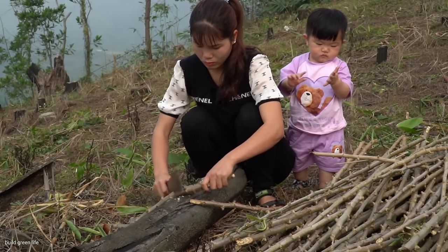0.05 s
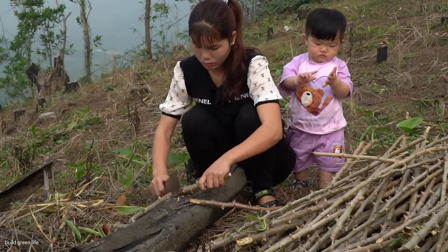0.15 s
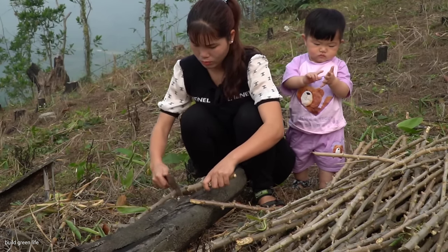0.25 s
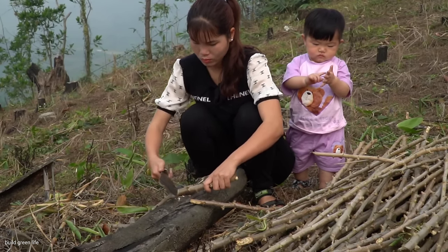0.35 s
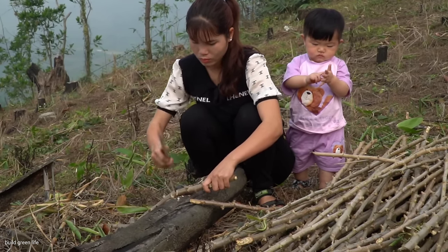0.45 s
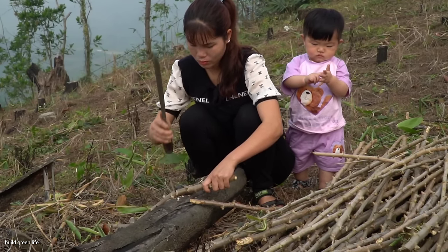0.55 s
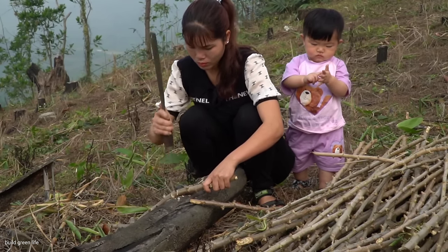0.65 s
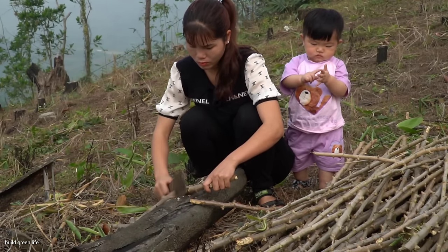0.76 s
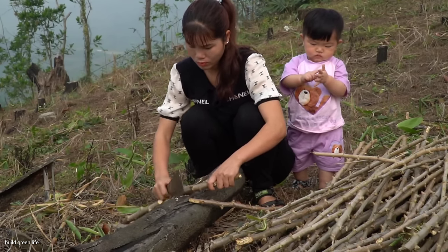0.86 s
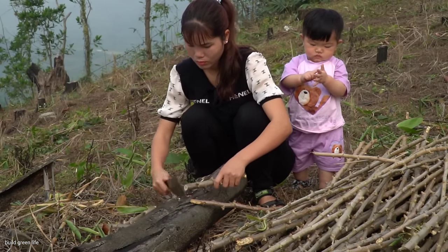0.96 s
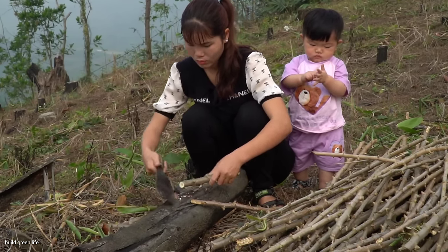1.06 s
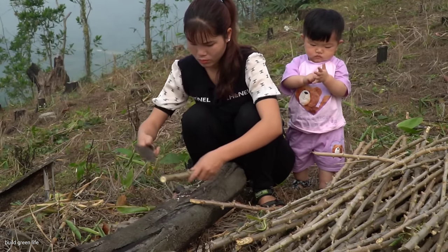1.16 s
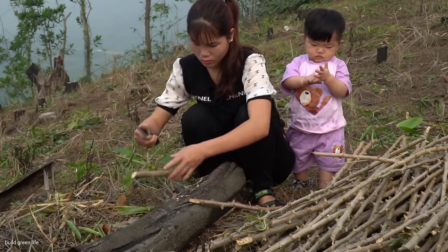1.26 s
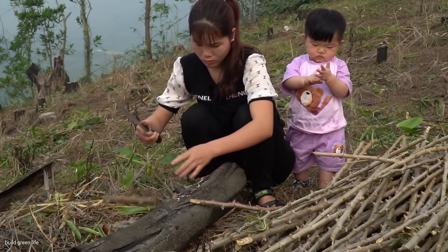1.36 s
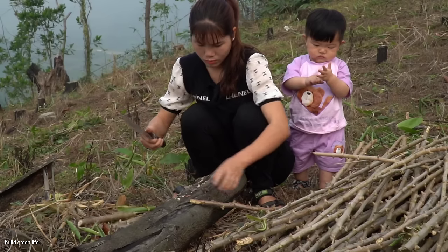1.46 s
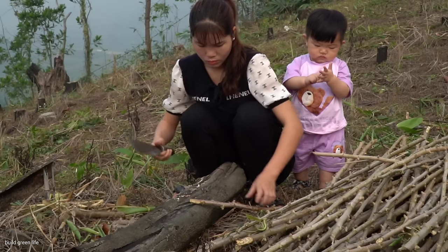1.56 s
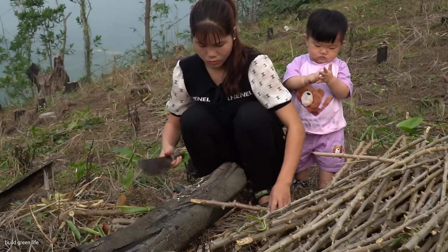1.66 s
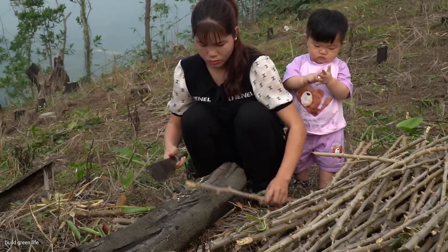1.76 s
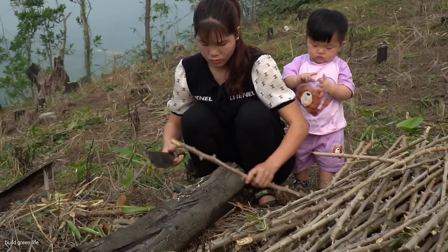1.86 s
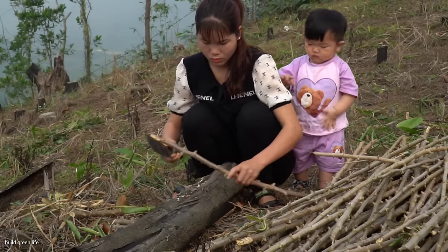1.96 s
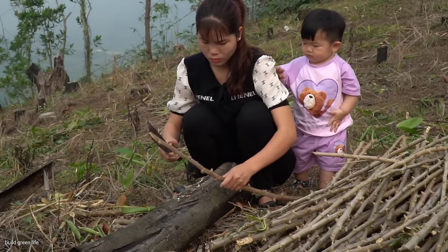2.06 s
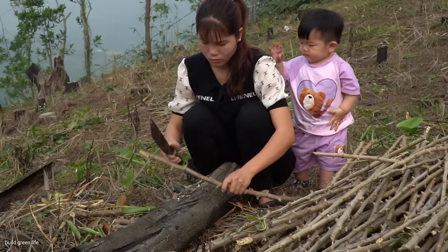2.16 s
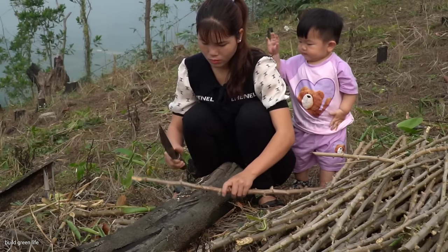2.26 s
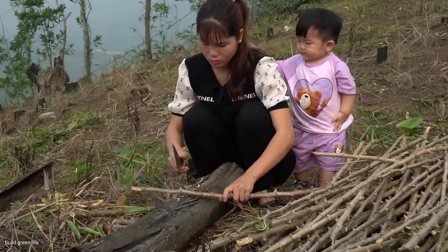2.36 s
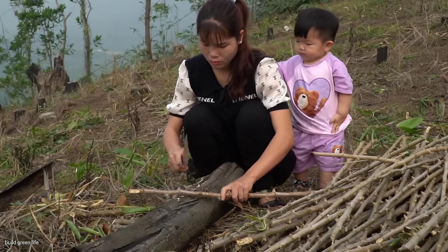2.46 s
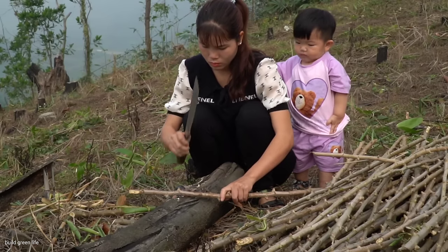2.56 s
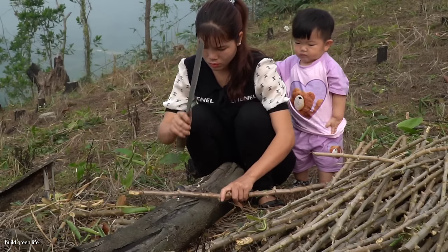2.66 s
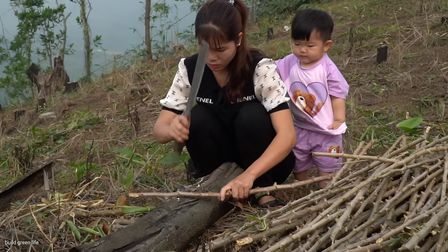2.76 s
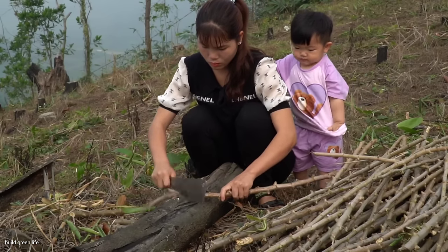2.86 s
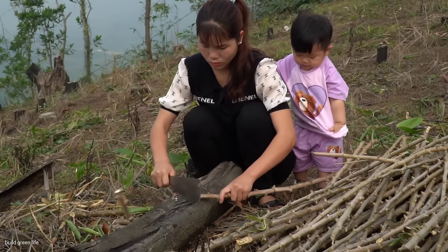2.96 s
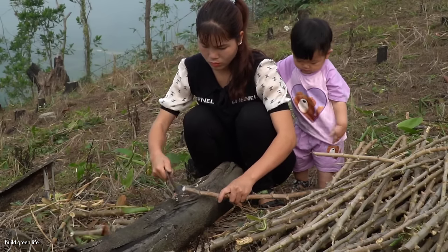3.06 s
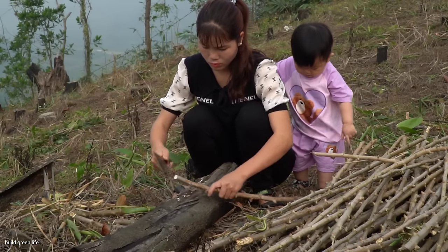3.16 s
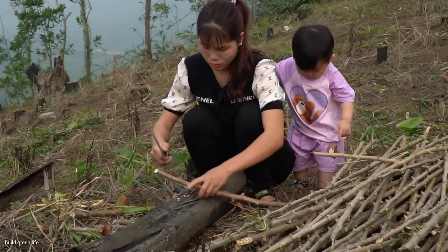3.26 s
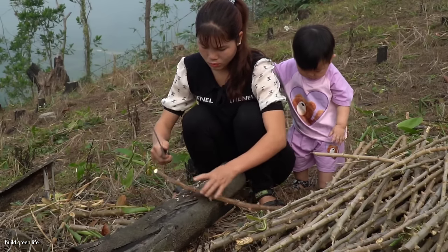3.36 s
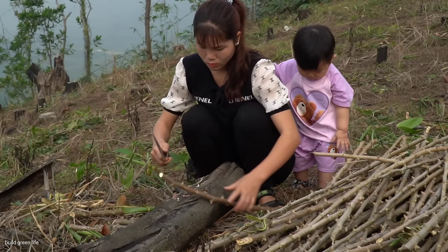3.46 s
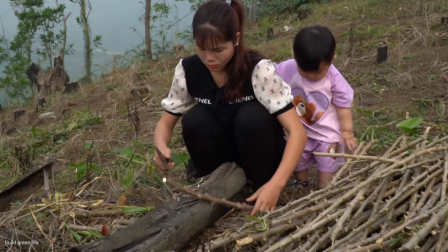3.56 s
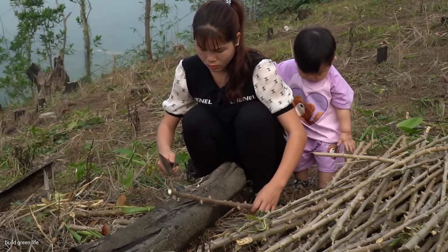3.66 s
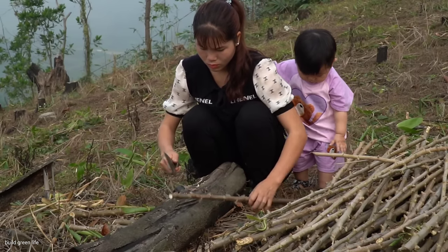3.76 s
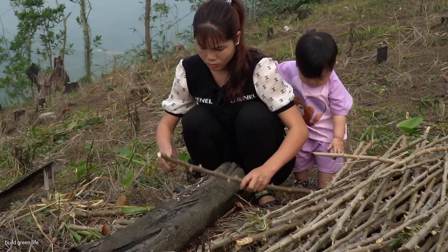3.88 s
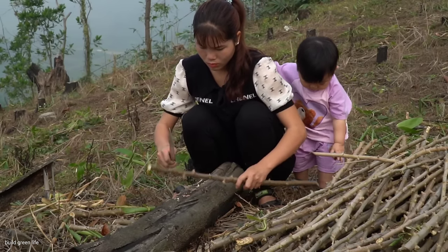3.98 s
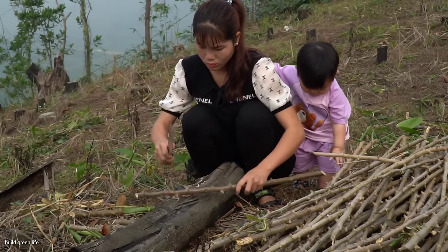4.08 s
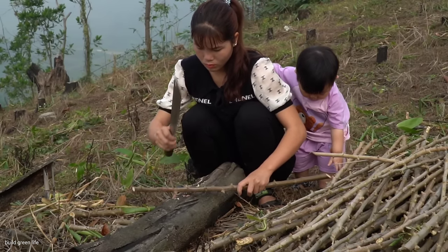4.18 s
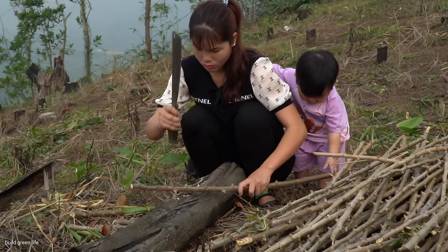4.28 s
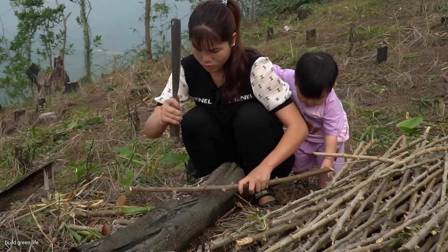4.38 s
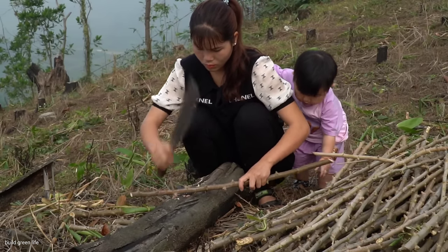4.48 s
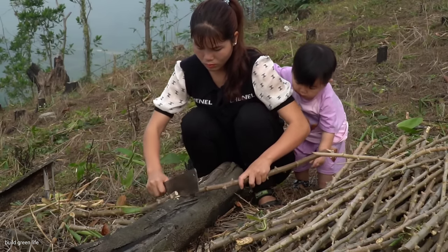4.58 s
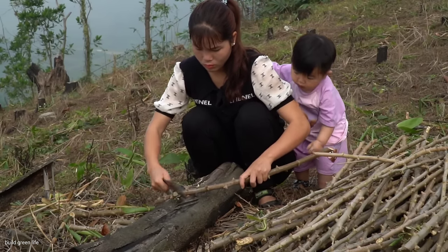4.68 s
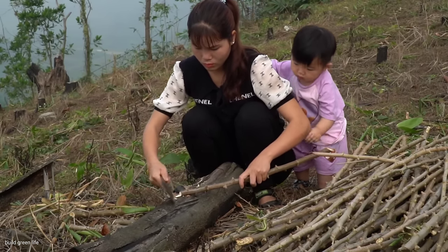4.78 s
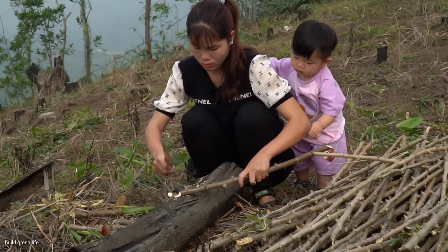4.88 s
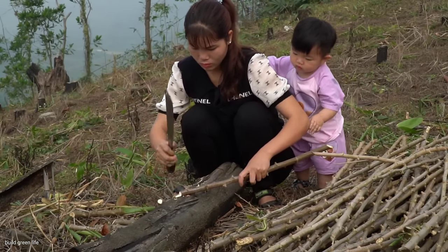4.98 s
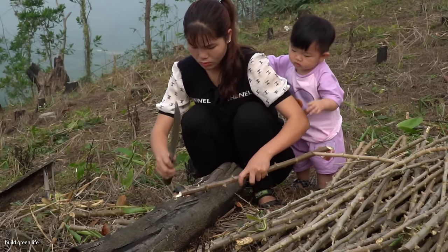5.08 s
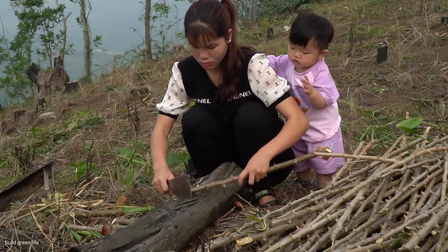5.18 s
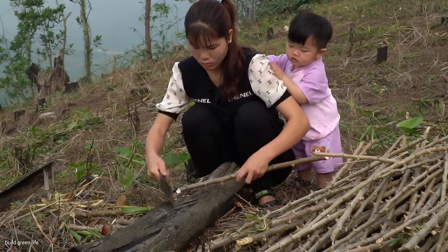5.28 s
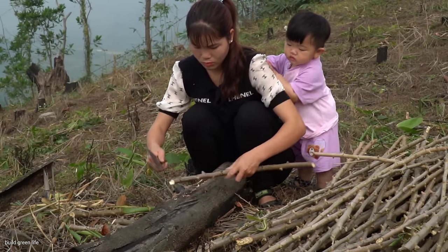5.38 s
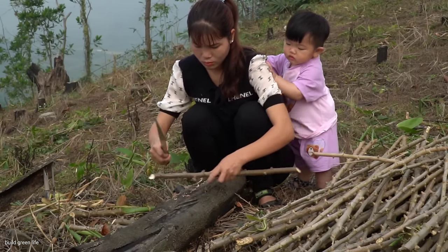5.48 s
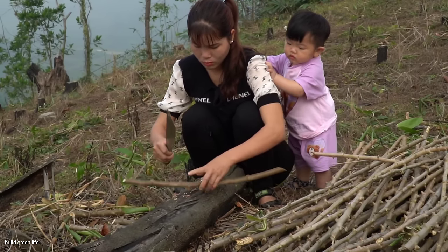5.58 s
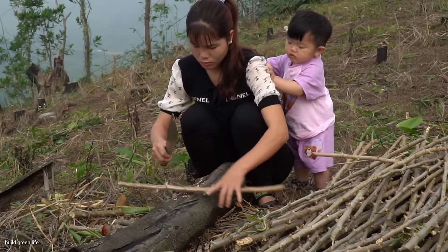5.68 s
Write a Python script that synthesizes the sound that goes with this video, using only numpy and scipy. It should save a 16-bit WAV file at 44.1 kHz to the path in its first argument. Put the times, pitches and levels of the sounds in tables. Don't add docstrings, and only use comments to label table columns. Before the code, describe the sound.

Outdoors, sharp uneven blade strokes split stems against a log, dull thuds following, over birdsong, insect shimmer, pump hum and a faraway engine.

```python
import sys
import numpy as np
from scipy import signal
from scipy.fft import rfft, irfft
from scipy.io import wavfile
from scipy.ndimage import uniform_filter1d

SR = 44100
rng = np.random.default_rng(int(sys.argv[2]) if len(sys.argv) > 2 else 0)


def gain_from_db(level_db):
    decades = np.asarray(level_db, float) / 20
    return 10 ** decades


def wav_record(signal):
    frames = np.transpose(np.atleast_2d(signal))
    bounded = np.clip(frames, -1, 1)
    quanta = np.round(bounded * 32767).astype(np.int16)
    wavfile.write(sys.argv[1], SR, quanta)


N = 252680
T = np.arange(N) / SR
MONO_DB = 2.5


def unit(x):
    return x / np.sqrt(np.mean(x ** 2))


def colour(shape):
    hz, db = np.transpose(shape)
    freq_hz = np.maximum(np.arange(N // 2 + 1) * SR / N, 1)
    gain = gain_from_db(np.interp(np.log(freq_hz), np.log(hz), db))
    return unit(irfft(rfft(rng.standard_normal(N)) * gain, N))


def noise_band(lo_hz, hi_hz):
    sos = signal.butter(2, [lo_hz, hi_hz], "band", fs=SR, output="sos")
    return unit(signal.sosfilt(sos, rng.standard_normal(N)))


def walk(rate_hz):
    hold = int(SR / rate_hz)
    steps = np.repeat(rng.standard_normal(N // hold + 1), hold)
    return unit(uniform_filter1d(uniform_filter1d(steps, hold), hold)[:N])


def curve(rows, column=1, outside=-120):
    rows = np.array(rows)
    return np.interp(T, rows[:, 0], rows[:, column], outside, outside)


def add(out, start_s, x):
    i = max(int(start_s * SR), 0)
    out[i:i + len(x)] += x[:N - i]


def fade(db, t60_s, rise_s=0.0012):
    t = T[:int(SR * min(t60_s, 1))]
    return gain_from_db(db - 60 * t / t60_s) * (1 - np.exp(-t / rise_s))


def ring(hz, db, t60_s, rise_s=0.001, pinch=0):
    pinch_s = 0.0038
    shape = fade(db, t60_s, rise_s)
    t = T[:len(shape)]
    return shape * np.sin(2 * np.pi * hz * (t - pinch * pinch_s * (1 - np.exp(-t / pinch_s))))


# freq_hz, level_db
HISS = [(10, 26), (25, 10), (100, 9), (400, 3), (3200, -1.5), (15300, 0.5), (15800, -40)]


def input_hiss():
    return colour(HISS) * gain_from_db(-57.5)


# freq_hz, level_db
AIR = [(15, -76), (25, 1.5), (59, -14), (223, -18), (476, -25.5), (624, -22), (734, -23), (1130, -28),
       (3720, -33.5), (4610, -39), (5730, -38.5), (14800, -47), (16000, -71)]
# time_s, level_db
GUST = [(0.0, -19.5), (0.45, -32.5), (0.65, -24), (1.05, -35), (1.72, -24.5), (2.28, -19.5), (2.46, -33),
        (2.71, -20.5), (2.97, -25), (3.3, -19), (3.6, -28), (3.88, -23), (4.0, -37), (4.62, -31.5),
        (5.09, -20), (5.37, -23), (5.5, -14), (5.73, -37)]


def hillside():
    gust_db = curve(GUST)
    breeze_db = uniform_filter1d(gust_db, size=SR // 2)
    breeze_db = breeze_db - breeze_db.mean()
    hush_db = -39 + MONO_DB - 1.5 + 0.096 * breeze_db + 0.14 * walk(4.87)
    hush = colour(AIR) * gain_from_db(hush_db)
    return hush + noise_band(3.9, 10.0) * gain_from_db(gust_db + MONO_DB)


# time_s, firing_hz, level_db
ENGINE = [(0.0, 147.7, -41), (0.37, 113, -43), (0.57, 78.5, -45), (0.77, 122.1, -39.5), (1.3, 74, -62),
          (1.52, 105.5, -42.5), (1.75, 106.4, -41), (1.9, 75.55, -46), (2.05, 82.2, -44),
          (2.22, 110.8, -39.5), (2.65, 74.1, -65), (2.97, 112, -39), (3.25, 77.9, -45), (3.5, 79.8, -46),
          (3.72, 113.7, -39.5), (4.2, 72.2, -69), (4.6, 102.7, -46.5), (5.15, 98, -50)]


def engine():
    last_s, last_hz, last_db = ENGINE[-1]
    pull_away_hz_per_s = 75
    end = (T[-1], last_hz + pull_away_hz_per_s * (T[-1] - last_s), last_db + 6.5)
    blips = ENGINE + [end]
    hz = uniform_filter1d(curve(blips, outside=100), size=SR // 20)
    phase = 2 * np.pi * np.cumsum(hz * (1 + 0.016 * walk(21.94))) / SR
    tone = np.sin(phase) + gain_from_db(-13) * np.sin(4 / 3 * phase) + gain_from_db(-15) * np.sin(2 * phase)
    roar = gain_from_db(-18) * noise_band(800, 1100) * (hz / 100) ** 2
    slowing = np.clip(-np.gradient(hz) * SR / 100, 0, 1)
    level_db = curve(blips, column=2) + 7.5 - 6 * slowing + 2 * walk(23.15)
    return (tone + roar) * gain_from_db(level_db)


# pitch_hz, level_db
PUMP = [(53, -41.5), (107, -49.5), (160, -55.5), (212, -51.5), (265, -58)]


def pump():
    hum = np.zeros(N)
    for hz, db in PUMP:
        level = gain_from_db(db + 2.45 * walk(5.4))
        hum += level * np.sin(2 * np.pi * hz * T + walk(3.68))
    return hum


def insects_and_flock():
    flock = noise_band(4000, 5170) * gain_from_db(-57.5 + 1.3 * walk(40))
    insects = noise_band(4296, 4694) * gain_from_db(-50 + 2.4 * walk(120) + 0.63 * walk(15))
    thinning_db = np.interp(T, [3.1, 3.7], [0, -5])
    chorus = noise_band(4800, 6300) * gain_from_db(-61 + thinning_db + 3.1 * walk(25.03))
    return flock + insects + chorus


# delay_s, from_hz, to_hz, length_s, level_db
NOTES = [(-.004, 7100, 4660, 0.026, 0), (0.059, 5300, 3097, 0.027, 3.5)]
# start_s, from_hz, to_hz, length_s, level_db
CHEEPS = [(1.39, 3270, 4630, 0.043, -42), (1.93, 3400, 4350, .025, -43), (2.115, 3337, 4500, 0.023, -42),
          (2.12, 6310, 6000, 0.076, -51), (2.2, 6400, 5860, .06, -54), (.69, 3900, 3000, .025, -47),
          (.9, 4800, 3190, .03, -46), (1.42, 5000, 3310, .03, -52), (1.6, 4800, 3290, 0.033, -43),
          (2.075, 6200, 4720, 0.021, -44), (2.55, 5620, 4160, 0.018, -45), (3.3, 6300, 5290, .05, -48),
          (2.32, 6130, 4610, 0.036, -42.5), (2.37, 6840, 5940, 0.046, -52), (2.62, 6450, 4600, 0.022, -47),
          (2.655, 6040, 4930, 0.032, -45.5), (4.41, 6800, 4740, 0.017, -51),
          (5.365, 6300, 6160, 0.086, -54), (5.5, 5060, 5890, .05, -49), (5.55, 5860, 7170, 0.059, -52),
          (5.6, 7240, 7000, .12, -62)]


def birds():
    calls = list(CHEEPS)
    for i in range(10):
        phrase_s = .502 + i * (.168 + i * .0009)
        for delay_s, from_hz, to_hz, length_s, db in NOTES:
            calls.append((phrase_s + delay_s, from_hz, to_hz, length_s, db - 44.5))
    for a, b, c in rng.random((130, 3)):
        calls.append((2.7 * a, 5200 + 1600 * b, 3600 + 1500 * b, .03, -55 + 4 * c))
    out = np.zeros(N)
    warble = 1.2 * walk(700)
    for start_s, from_hz, to_hz, length_s, db in calls:
        size = int(length_s * SR)
        phase = 2 * np.pi * np.cumsum(np.geomspace(from_hz, to_hz, size)) / SR
        phase = phase + warble[int(start_s * SR):][:size]
        shape = np.hanning(size) ** 0.11 * np.linspace(.55, 1.2, size)
        add(out, start_s, gain_from_db(db) * shape * np.sin(phase))
    trees = fade(-32, 0.25, rise_s=0.0031)
    trees = trees * rng.standard_normal(len(trees))
    return out + signal.fftconvolve(out, trees)[:N]


# start_s, end_s, bright_db, woody_db
RUSTLES = [(0.12, 0.15, -27, -50), (0.153, 0.175, -43, -60), (0.343, 0.361, -44, -64),
           (0.359, 0.414, -53, -44), (0.879, 0.95, -68, -44), (1.081, 1.13, -64, -46),
           (1.5, 1.64, -46, -48), (1.614, 1.71, -52.5, -50), (1.695, 1.803, -49, -41),
           (1.85, 1.955, -55.5, -52), (2.056, 2.087, -64, -47.5), (2.22, 2.27, -68, -47.5),
           (2.947, 3.026, -56, -40), (3.122, 3.188, -42, -52), (3.142, 3.173, -50, -41),
           (3.168, 3.226, -51, -64), (3.31, 3.388, -47, -57), (3.335, 3.376, -70.5, -37.5),
           (3.373, 3.43, -55, -45), (3.588, 3.7, -41.5, -43), (3.725, 3.838, -52, -49.5),
           (3.848, 3.92, -59, -69.5), (4.608, 4.637, -30, -55), (4.637, 4.67, -41, -50),
           (1.46, 1.5, -55, -70), (4.783, 4.844, -49.5, -42.5), (4.927, 4.999, -51, -53),
           (5.147, 5.217, -54.5, -54), (5.24, 5.248, -36, -38), (5.298, 5.33, -60, -55),
           (5.669, 5.716, -56, -49.5)]
# start_s, end_s, bright_db, green_db, woody_db
TEARS = [(0.1227, 0.127, -24, -12, -12), (0.8494, 0.8519, 0, -18, -13), (0.852, 0.855, -28, -34, -20),
         (2.9424, 2.951, -8.5, -13, -20), (4.609, 4.615, -3, -13, -6), (5.24, 5.243, -41, -27, -24),
         (5.242, 5.2447, -28, -19, -22)]
# start_s, bright_db, woody_relative_db, t60_s
BREAK = [(.3308, -30, -14, .012), (.336, -17, -14, .014), (.3378, -20, -16, .022), (.3499, -23, -14, .022),
         (.359, -25, -12, .014), (.3618, -25, -8, .02), (.3655, -29, -8, .03), (.3988, -33, -4, .045)]
# start_s, level_db
SNAPS = [(1.727, -35), (1.747, -36), (1.8774, -59), (2.2934, -41.5), (2.8646, -36.5), (2.9645, -33),
         (3.1245, -35.5), (3.133, -45), (3.3455, -37), (3.5977, -46), (3.6077, -37), (1.5427, -44),
         (1.7123, -48), (3.183, -34), (3.1897, -46), (3.494, -46), (3.59, -34), (3.634, -40), (3.6433, -45),
         (3.688, -36.5), (3.9758, -43), (4.1396, -48), (4.3439, -47), (4.618, -20), (4.638, -25),
         (4.652, -30), (4.664, -35), (4.657, -36), (4.6715, -42), (4.6928, -35.5), (4.732, -36.5),
         (4.779, -41), (4.7875, -37), (4.9441, -49), (5.45, -41)]
# start_s, level_db
TAPS = [(0.1915, -53), (0.8877, -29), (1.1029, -26), (1.491, -29), (1.5023, -22.5), (1.513, -26),
        (1.561, -36), (1.8063, -38), (2.986, -38), (3.347, -37), (3.3871, -24), (3.457, -40),
        (3.4935, -34.5), (3.9756, -39), (4.638, -27), (4.8104, -41), (4.9444, -34.5), (5.0701, -33),
        (5.279, -25), (5.3644, -23), (5.448, -35.5), (5.526, -40)]
# start_s, level_db
GREEN_SNAPS = [(.162, -36), (.8873, -37), (4.6095, -8), (4.612, -14), (4.638, -26), (4.621, -24),
               (2.9435, -12), (5.248, -35), (5.2795, -38), (5.333, -48)]
# freq_hz, level_db
BARK = [(3500, -11), (5200, 4), (6600, -2.5), (9300, 3.5), (11500, -0.5), (15300, -3), (15900, -55)]
# freq_hz, level_db
TWIG = [(200, -6), (420, -2.5), (700, -2), (1250, -4), (1600, -6.5), (2100, -6), (2600, -7.5), (3200, -6),
        (4200, -19.5), (6500, -27.5)]
# freq_hz, level_db
GREEN = [(4000, -9), (6000, -3), (9500, 4), (11000, -12), (15300, -18), (15900, -55)]


def twigs():
    bright, green, woody, rub, drag = np.zeros((5, N))
    clicks = list(BREAK)
    clicks += [(s, db, -14, 0.03) for s, db in SNAPS]
    clicks += [(s, db - 27, 27, 0.021) for s, db in TAPS]
    for s, db, wood_db, t60_s in clicks:
        add(bright, s, fade(db - 2, t60_s, rise_s=.00015))
        add(bright, s, fade(db + 4, .005, rise_s=.0001))
        add(woody, s, fade(db + wood_db + 1, 1.6 * t60_s, rise_s=.0008))
    for s, db in GREEN_SNAPS:
        add(green, s, fade(db + 3, .022, rise_s=.0002))
    rubs = [(start, end, db, -99, wood_db) for start, end, db, wood_db in RUSTLES]
    for start, end, db, green_db, wood_db in rubs + TEARS:
        shape = signal.windows.tukey(int((end - start) * SR), .5)
        add(rub, start, gain_from_db(db) * shape)
        add(green, start, gain_from_db(green_db) * shape)
        add(drag, start, gain_from_db(wood_db) * shape)
    grain = gain_from_db(4.5 * walk(800) + 1.1 * walk(120))
    dry_fibre = (bright + rub * grain) * colour(BARK)
    wood = (woody + drag * grain) * colour(TWIG)
    return gain_from_db(MONO_DB) * (dry_fibre + wood + green * colour(GREEN))


# start_s, crack_db, stem_hz, stem_db, limiter_dive_db
CHOPS = [
    (0.1231, 1.5, 662, 9, 23),
    (0.8491, 0, 633, 15, 23.5),
    (2.9432, 3.5, 668, 17, 22.5),
    (4.6096, -5, 653, 4.5, 17.5),
    (5.241, -9.5, 627.6, 6, 12.5),
]
PINCH = [.02, 0.08, .2, 0.11, 0.041]
# touch_s, how long the edge touches bark before it bites
TOUCH_S = [0.00059, 0.0017, 0.00061, .0008, .001]
STEM_RING = [1, 0.97, .8, 0.94, 0.92]
# pitch_ratio, level_db, t60_s
STEM = [(1.002, 3.5, 0.056), (.93, -26, 0.0058), (1.069, -29, 0.14), (1.588, -7.5, 0.042),
        (2.08, -13, 0.03), (2.6, -18, 0.036), (3.1, -17.5, 0.035)]
# freq_hz, level_db
CRACK = [(250, -49), (500, 0), (800, -8), (1400, -4.5), (2150, -6), (2450, -22), (3200, -24), (4500, -18),
         (9000, -22.5)]
# start_s, pitch_hz, level_db, t60_s
BITES = [(.1232, 662, 7.5, 0.084), (.1233, 985, 19, .02), (.1232, 678, -1, .14), (.132, 1040, -12, .06),
         (.3365, 2000, -14.5, 0.018), (0.31, 2030, -23, 0.011), (.8497, 2070, 10, 0.016),
         (.8497, 1706, 16.5, 0.014), (2.9436, 966, 16.5, 0.021), (.8497, 3300, 2, .014),
         (2.944, 2090, 12, 0.014), (2.947, 6200, -16, 0.045), (2.947, 7700, -10, .04),
         (4.61, 2520, 9.5, 0.02), (4.61, 2146, 9.5, 0.016), (4.61, 3000, -3, 0.023),
         (4.61, 1130, 13, 0.019), (4.6095, 550, 0.5, 0.029), (2.9435, 530, 9.5, .016),
         (2.944, 1840, 12, 0.017), (.8495, 980, 10.5, 0.02), (.8495, 1957, 14.5, 0.019),
         (.8495, 1325, 11, 0.016), (.8497, 2200, 9, 0.013), (.1233, 1656, 9, .014), (2.944, 1375, 7, 0.015),
         (.8497, 1500, 8, .012), (.1233, 2174, 12, 0.014), (2.944, 9100, 6, .012), (5.2411, 1047, -7, 0.11)]


def stems():
    stem, bite, crack = np.zeros((3, N))
    for (s, crack_db, hz, stem_db, _), pinch, touch_s, share in zip(CHOPS, PINCH, TOUCH_S, STEM_RING):
        add(crack, s - touch_s, fade(crack_db - 14, .01))
        add(crack, s, fade(crack_db + 15.5, 0.025, rise_s=0.0063))
        for ratio, db, t60_s in STEM:
            add(stem, s, ring(hz * ratio, stem_db + db, t60_s * share, pinch=pinch))
    for s, hz, db, t60_s in BITES:
        add(bite, s, ring(hz, db, t60_s))
    rattle = gain_from_db(1.5 * walk(200))
    no_bass = signal.butter(2, 420, "high", fs=SR, output="sos")
    return signal.sosfilt(no_bass, stem * rattle + crack * colour(CRACK) + bite)


# start_s, level_db, t60_s
LOG_LOW = [(.123, -3, .2), (.415, -35, .14), (.85, -3, .29), (2.945, 3.5, .15), (4.13, -33, .29),
           (4.611, 3, .14), (5.242, 2, .19), (5.275, -8, .08)]
# start_s, pitch_hz, level_db, t60_s
LOG_UP = [(.123, 336, -1, .15), (.415, 340, -23.5, .14), (.8495, 332.3, -7, .27), (2.945, 339.4, -3, .13),
          (4.13, 342, -34, .29), (4.611, 339, -8, .11), (5.242, 353.5, -11, .15), (5.275, 340, -8.5, .072)]
# start_s, pitch_hz, level_db
KNOCKS = [(.191, 1830, -29), (.195, 680, -22), (.415, 615, -20.5), (.415, 450, -21.5), (.921, 665, -21),
          (1.106, 430, -18), (1.104, 1296, -21.5), (1.805, 2020, -26.5), (1.805, 443, -26),
          (2.424, 570, -23.5), (3.389, 453, -17.5), (3.387, 1164, -17.5), (4.802, 504, -29),
          (4.813, 1500, -31), (1.9, 1350, -31), (2.068, 1900, -33), (2.062, 700, -30), (2.1, 790, -30),
          (2.235, 1550, -33), (2.232, 1150, -34), (3.371, 240, -22), (3.379, 310, -27), (3.135, 1100, -26),
          (3.345, 3300, -29), (1, 244, -22), (4.945, 960, -26), (5.069, 1690, -26.5), (5.068, 577, -22.5),
          (5.07, 312, -19), (5.363, 302, -11.5), (5.698, 273, -21)]
# start_s, pitch_hz, level_db, t60_s
CHIPS = [(.89, 1350, -28, 0.045), (.97, 1400, -36, .08), (2.955, 2950, -16, .05), (2.957, 1030, -20, .03),
         (2.964, 1734, -14, .04), (2.986, 620, -20, 0.045), (2.987, 2880, -28, 0.053),
         (2.988, 3230, -29, 0.045), (2.988, 1600, -27, .05), (2.99, 956, -26, .06), (3.015, 694, -26, .04),
         (3.015, 1420, -31, .04), (4.618, 1050, -15, 0.057), (4.622, 2720, -25, 0.087),
         (4.638, 1480, -23, .05), (4.64, 656, -17, 0.057), (4.676, 1470, -34, .04),
         (4.687, 719, -26.5, .04), (4.699, 720, -30, .03), (4.731, 1132, -26.5, 0.028),
         (4.79, 3282, -28.5, .03), (5.272, 3110, -26, 0.075), (5.275, 1070, -18, 0.056),
         (5.275, 695, -16, 0.065)]
# pitch_hz, level_db, t60_s
BLADE = [(3140, -16, .1), (9300, -2, .06)]
# start_s, level_db
BLADE_RINGS = [(2.943, -20), (5.2417, -3.5), (5.279, -35)]


def log_and_loose_wood():
    out = np.zeros(N)
    for s, db, t60_s in LOG_LOW:
        add(out, s, ring(308.4, db, t60_s, rise_s=0.018))
    for s, hz, db, t60_s in LOG_UP:
        add(out, s, ring(hz, db, t60_s, rise_s=0.003))
    rings = CHIPS + [(s, hz, db, 0.033) for s, hz, db in KNOCKS]
    for s, blow_db in BLADE_RINGS:
        rings += [(s, hz, db + blow_db, t60_s) for hz, db, t60_s in BLADE]
    for s, hz, db, t60_s in rings:
        add(out, s, ring(hz, db, t60_s))
    return out * gain_from_db(1.3 * walk(70))


# freq_hz, level_db
WOOD = [(450, 0.5), (680, 8.5), (850, 3.5), (1040, 1), (1400, -5), (1750, 0.5), (2100, -5), (2600, -3.5),
        (3100, -6), (3600, -17.5)]


def splinters():
    tail = np.zeros(N)
    for s, *_ in CHOPS:
        add(tail, s, fade(-29, 0.43, rise_s=0.0021))
    return tail * colour(WOOD) * gain_from_db(4.7 * walk(100))


# crest_s, pitch_hz, level_db
THUDS = [(0.221, 47, -8), (0.9655, 44.2, -8.5), (3.061, 44.7, -12), (4.706, 46.7, -10.5),
         (5.358, 47.3, -13.5)]
# crest_s, pitch_hz, level_db, length_s
JOLTS = [(5.676, 39.7, -8, 0.072), (5.718, 21.3, -3, 0.044)]


def thuds():
    out = np.zeros(N)
    thud_s = .19
    waves = list(JOLTS)
    for s, hz, db in THUDS:
        waves.append((s, hz, db, thud_s))
        waves.append((s + .167, 46.7, db - 15, thud_s))
    for s, hz, db, length_s in waves:
        swell = np.hanning(int(length_s * SR))
        t = T[:len(swell)] - length_s / 2
        add(out, s - length_s / 2, gain_from_db(db) * swell * np.cos(2 * np.pi * hz * t))
    return out


# pitch_hz, level_db, t60_s
BUTT = [(240, -13, 0.033), (160, -18, 0.044), (480, -22, .02), (800, -23, .02), (1300, -20, 0.045)]
# pitch_hz, level_db, t60_s
DROP = [(964, -11, 0.16), (812, -27, .058), (1120, -19.5, 0.082), (1346, -16.5, .05), (1448, -24, .059),
        (1680, -16.5, 0.076), (1770, -14.5, 0.05), (2234, -19, 0.075), (2573, -26, .049), (141, -22, 0.046)]


def dropped_stem():
    out = np.zeros(N)
    land_s, butt_lead_s = 1.5024, .0115
    for start_s, modes in [(land_s - butt_lead_s, BUTT), (land_s, DROP)]:
        for hz, db, t60_s in modes:
            add(out, start_s, ring(hz, db, t60_s, rise_s=0.00052))
    return out


def scene():
    far = hillside() + engine() + pump() + insects_and_flock() + birds()
    near = twigs() + stems() + log_and_loose_wood() + splinters() + thuds() + dropped_stem()
    return np.array([far + near, np.zeros(N)])


DIVE_S = [0, .0015, .0026, .013, .018, .052]
DIVE_SHARE = [0.0029, 0.24, 0.76, 0.83, 0.52, 0.0061]


def limiter(x):
    dive_db = np.zeros(N)
    for s, _, _, _, depth_db in CHOPS:
        dive_db += depth_db * np.interp(T - s, DIVE_S, DIVE_SHARE)
    return np.clip(x * gain_from_db(-dive_db), -.9, .9)


def top_cut(x):
    return signal.sosfilt(signal.butter(12, 16450, fs=SR, output="sos"), x)


def record(dry):
    right_only = np.array([[0], [1]])
    limited = limiter(dry + right_only * input_hiss())
    treble_end = signal.ellip(8, .2, 60, 15500, fs=SR, output="sos")
    mix = signal.sosfilt(treble_end, limited)
    return top_cut(mix)


dry = scene()
out = record(dry)
wav_record(out)
```